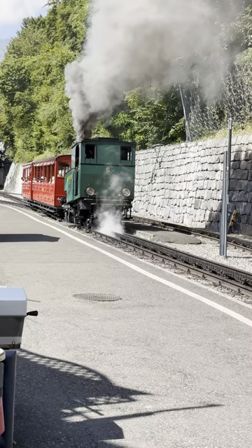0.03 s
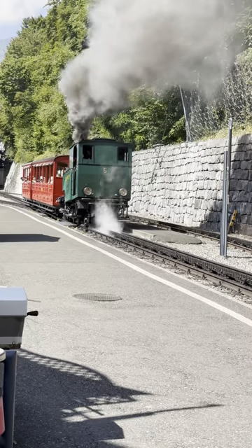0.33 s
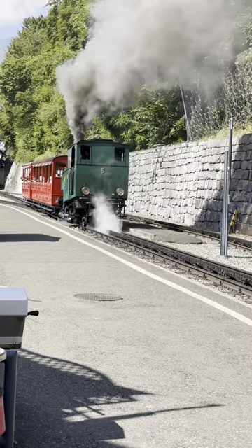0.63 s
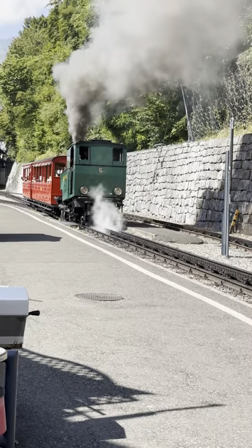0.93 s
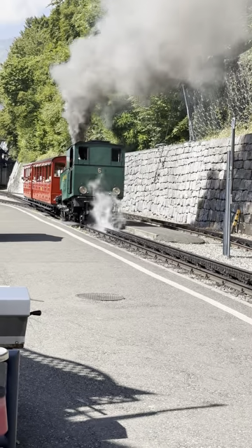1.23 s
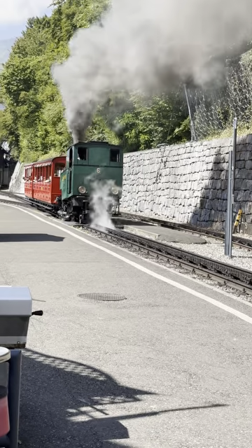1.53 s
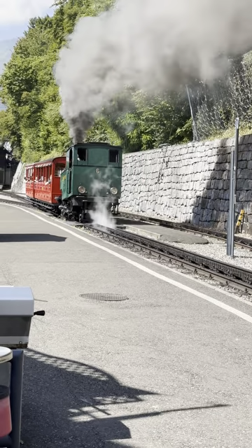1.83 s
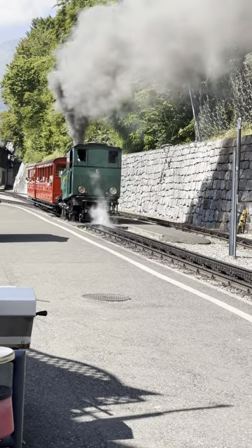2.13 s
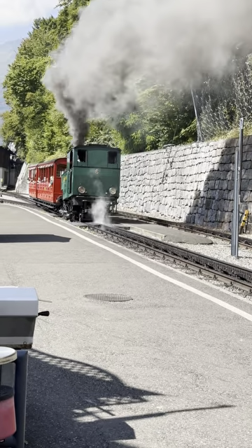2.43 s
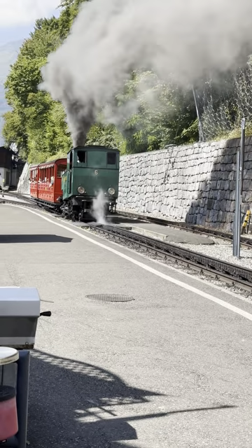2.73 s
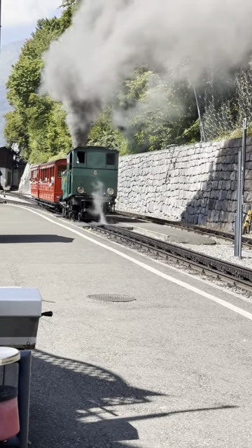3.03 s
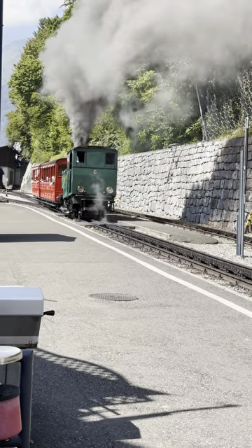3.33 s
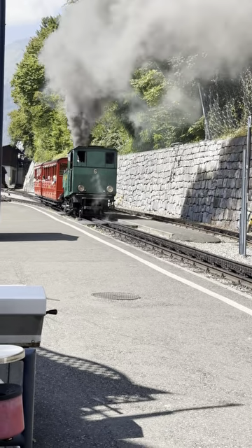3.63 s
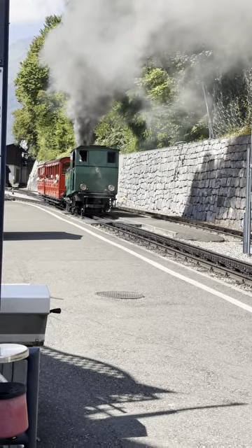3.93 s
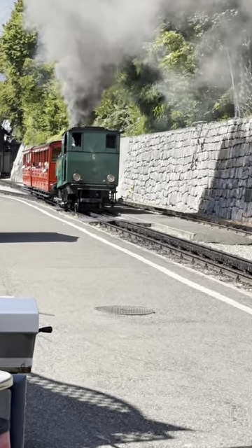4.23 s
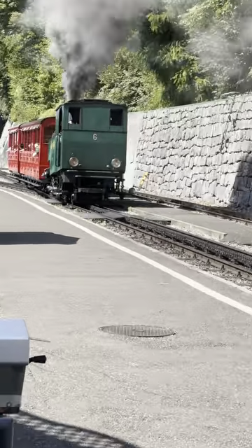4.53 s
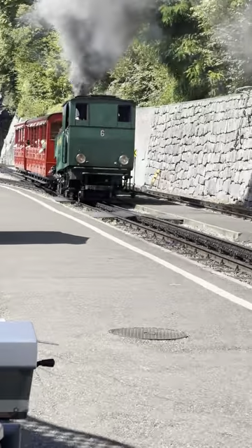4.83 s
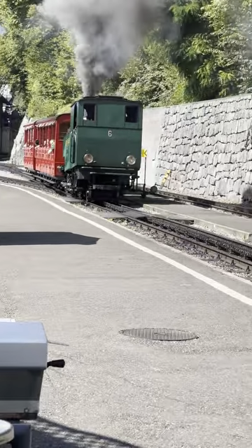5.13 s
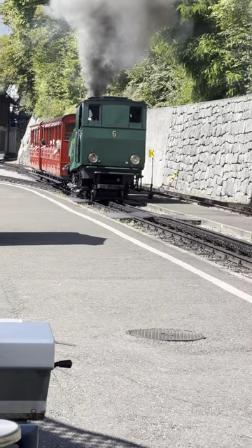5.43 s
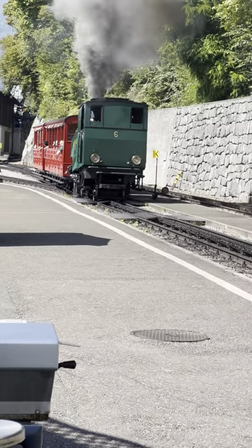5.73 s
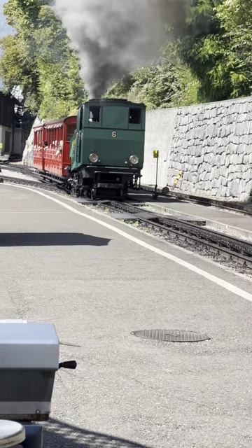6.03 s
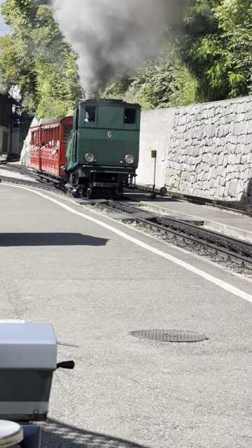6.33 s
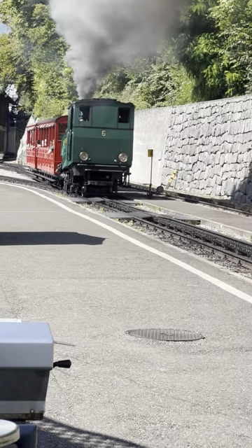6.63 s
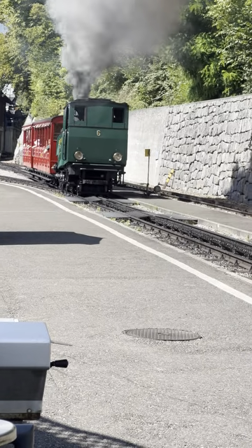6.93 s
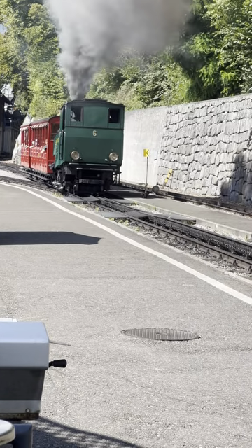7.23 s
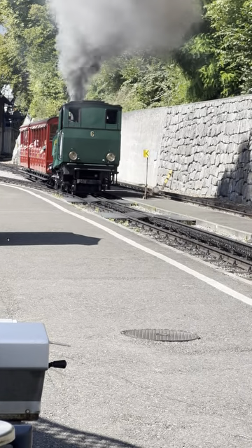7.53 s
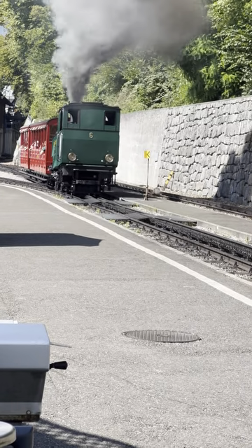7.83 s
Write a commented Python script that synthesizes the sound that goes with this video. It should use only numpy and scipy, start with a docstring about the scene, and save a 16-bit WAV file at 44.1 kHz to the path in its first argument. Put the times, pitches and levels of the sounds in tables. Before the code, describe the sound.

A short jet of steam shuts off, leaving a steam engine's rapid booming exhaust beats, deep rumble and a thin, fading leak.

```python
"""A jet of steam hisses from a small locomotive beside a platform, some way off in the open air.
The cock is shut after a second, leaving a thin, singing leak that fades. Throughout, the exhaust
beats about nine times a second, ringing the smokebox, chimney and blast pipe over the fire's rumble.
A loose part pings with the beats, the running gear clanks now and then, and a light breeze puffs."""
import sys
import numpy as np
from scipy.fft import rfft, irfft, next_fast_len
from scipy.io import wavfile
from scipy.ndimage import map_coordinates

SR = 44100
rng = np.random.default_rng(int(sys.argv[2]) if len(sys.argv) > 2 else 0)


def unload_audio(sound):
    """Save the sound as a 16-bit wav file, at the path given as the first command line argument."""
    columns = np.transpose(np.atleast_2d(sound))
    # keep every value between -1 and 1, then stretch to whole-number steps
    steps = np.round(np.clip(columns, -1, 1) * 32767)
    wavfile.write(sys.argv[1], SR, steps.astype(np.int16))


N = 347508
TIME = np.arange(N) / SR

# Slow trend of the smokebox boom. Each row: time in seconds, level in dB.
BOOM_TREND = [(0, -35.5), (.4, -28), (1.4, -30.5), (1.78, -39.5), (2.05, -29), (3.3, -32), (3.7, -39),
              (4.08, -26), (4.8, -35), (6.4, -37.5), (6.9, -31), (7.2, -40), (7.88, -32.5)]


def amp(db):
    """Decibels to gain."""
    return 10 ** (np.asarray(db) / 20)


def unit(x):
    """Scale to rms 1."""
    return x / np.sqrt(np.mean(x ** 2) + 1e-20)


def along(points, hz):
    """Interpolate (Hz, value) rows on a log frequency axis."""
    f, v = np.transpose(points)
    return np.interp(np.log(hz + 1), np.log(f + 1), v)


def curve(rows, times=TIME):
    """Interpolate (seconds, value) rows, by default at every sample."""
    return np.interp(times, *np.transpose(rows))


def fading(start_db, db_per_s, times=TIME):
    """A steadily falling level in dB."""
    return start_db - db_per_s * times


def wobble(rate_hz):
    """A smooth random curve with rate_hz knots a second."""
    knots = rng.standard_normal(int(N * rate_hz / SR) + 4)
    return map_coordinates(knots, [TIME * rate_hz], order=2)


def swell(t, rise_s, t60_s):
    """A soft rise to a crest at t = 0, then exponential decay."""
    return np.where(t < 0, np.exp(-(t / rise_s) ** 2), 1000 ** (-np.abs(t) / t60_s))


def filtered(x, response):
    """Apply a complex frequency response."""
    size = next_fast_len(N + SR // 4)
    return irfft(rfft(x, size) * response(np.fft.rfftfreq(size, 1 / SR)), size)[..., :N]


def colour(points):
    """Response of (Hz, dB) rows, falling away beyond both ends."""
    closed = [(points[0][0] / 2, -120), *points, (points[-1][0] * 2, -120)]
    return lambda f: amp(along(closed, f))


def resonances(modes):
    """Response of (Hz, width in Hz, dB) modes with steep skirts."""
    return lambda f: np.sqrt(sum(amp(db) ** 2 / (1 + ((f - hz) / width_hz) ** 2) ** 2
                                 for hz, width_hz, db in modes))


def rush(response):
    """Stereo turbulence of rms 1, nearly alike left and right."""
    # Stereo width. Each row: frequency in Hz, side against mid in dB.
    spread = [(40, -43.5), (70, -59.5), (150, -43), (300, -21.5), (640, -10), (1300, -8), (2500, -67.5),
              (5000, -52.5), (7000, -6.5), (10000, -7.5), (12000, -57), (15000, -1)]
    mid_side = lambda f: response(f) * np.array([np.ones_like(f), amp(along(spread, f))])
    mid, side = filtered(rng.standard_normal((2, N)), mid_side)
    return unit(np.array([mid + side, mid - side]))


def wall(x, echoes=8, echo_db=-20):
    """Weak early echoes off the stone wall and platform ripple the spectrum; output rms 1."""
    delays = (rng.uniform(.002, .03, echoes) * SR).astype(int)
    return unit(x + amp(echo_db) * sum(np.roll(x, delay, axis=-1) for delay in delays))


def jet(shut_s=1.12, closing_s=.14, sizzle_db_per_flow_db=2.4):
    """The open cock hisses, sizzles more as the flow rises, and spits twice before it is shut."""
    # Steam flow. Each row: time in seconds, relative level in dB.
    flow = [(0, -38.5), (.05, -40.5), (.16, -38.5), (.5, -42), (.68, -40), (.83, -41.5), (1.06, -52)]
    # Hiss and sizzle spectra. Each row: frequency in Hz, relative density in dB.
    hiss_colour = [(250, -25), (700, -4), (1100, -4.5), (2100, -1.5), (3300, 1.5), (4800, 0), (5900, 3),
                   (7300, 4.5), (9200, -0.5), (12000, -2), (15500, -13)]
    sizzle_colour = [(7500, -14.5), (10700, 4), (12500, 5), (15600, 3.5)]
    # Spurts of wet steam. Each row: crest in seconds, level in dB.
    spurts = [(.555, -40.5), (.93, -38)]
    flow_db = curve(flow)
    excess_db = flow_db - np.median([db for _, db in flow])
    opening = np.clip((shut_s - TIME) / closing_s, 0, 1)
    flutter = amp(0.6 * wobble(30.3))
    hiss = amp(flow_db + 2.5) * wall(rush(colour(hiss_colour)))
    sizzle = amp(-43 + sizzle_db_per_flow_db * excess_db) * wall(rush(colour(sizzle_colour)))
    spurting = sum(amp(db) * swell(TIME - s, rise_s=0.012, t60_s=0.39) for s, db in spurts)
    spit = rush(colour([(400, 6), (900, 2), (2000, -8), (3200, -1), (4500, -3), (7000, -11)]))
    return opening * flutter * (hiss + sizzle) + spurting * spit


def beat_times():
    """Times in seconds at which the crank passes an exhaust stroke, and that stroke's index."""
    # Crank speed. Each row: time in seconds, turns per second.
    speed = [(0, 2.26), (1.6, 2.305), (3.2, 2.416), (4.4, 2.433), (5.8, 2.298), (7.88, 2.297)]
    # Four slightly uneven strokes. Each entry: crank position in turns.
    stroke_turns = [.022, .266, .53, .791]
    turns = np.cumsum(curve(speed)) / SR
    marks = (np.arange(np.ceil(turns[-1]))[:, None] + stroke_turns).ravel()
    marks = marks[marks < turns[-1]]
    return np.interp(marks, turns, TIME), np.arange(len(marks)) % len(stroke_turns)


def beat_levels(times, stroke, scatter_db=1.78):
    """Boom, bark, rasp and ping dB of each beat: trend, stroke accent, chance and hard beats."""
    # The bark follows the engine's effort. Each row: time in seconds, level in dB.
    bark_trend = [(0, -45), (1.5, -43), (3.1, -41), (4.2, -41.5), (5.2, -41.5), (7.88, -44.5)]
    # Accents of the four strokes. Each row: extra boom, bark, rasp and ping in dB.
    accents = [(0, -1, 2, 2.5), (-0.5, -1.5, 1.5, -3), (0, 0, 1, 5), (0, 2, -0.5, 2)]
    # Beats that stand out. Each row: time in seconds, extra boom, bark and rasp in dB.
    hard_beats = [(.79, 2.5, -0.5, -2), (1.11, -3.5, 6.5, -2), (2.41, 3, -2.5, -2), (2.83, 4.5, -0.5, 2),
                  (2.94, 4, 1, 5.5), (3.03, -8, 4, 0.5), (3.13, 5, 4.5, 3), (3.35, 3.5, 0, 0),
                  (3.96, 5.5, 4, -5), (5.32, 1.5, 1.5, 3), (5.64, 8, -4, 0.5), (6.5, -1.5, 1.5, 3),
                  (6.61, 5, 3, 3)]
    rasp_db = fading(-50, db_per_s=0.6, times=times)
    ping_db = rasp_db - 3
    trend_db = np.transpose([curve(BOOM_TREND, times), curve(bark_trend, times), rasp_db, ping_db])
    levels_db = trend_db + np.array(accents)[stroke] + scatter_db * rng.standard_normal(trend_db.shape)
    for s, *extra_db in hard_beats:
        nearest = np.argmin(np.abs(times - s))
        levels_db[nearest, :3] += extra_db
    return levels_db.T


def puffs(sound, times, levels_db, rise_s, t60_s, lead_s=0):
    """One burst of sound(span, beat) per beat; levels_db sets its rms around the crest."""
    out = np.zeros((2, N))
    for beat, (s, db) in enumerate(zip(times, levels_db)):
        span = slice(max(0, int((s - .08) * SR)), int((s + .3) * SR))
        t = TIME[span] - s
        burst = sound(span, beat) * swell(t + lead_s, rise_s, t60_s)
        crest = (t > -.02) & (t < .03)
        out[:, span] += amp(db) * burst / np.sqrt(np.mean(burst[..., crest] ** 2))
    return out


def boom(times, levels_db, scatter_hz=4):
    """Each beat rings the smokebox's two low modes; turbulence shakes their strength and phase."""
    # Each row: mode in Hz, relative level in dB, share of the trend followed, growth in dB per second.
    smokebox_modes = [(210.9, -0.5, 0.87, 0), (254.7, -10, 0.13, 0.67)]
    trend_db = curve(BOOM_TREND, times)
    swing_db = trend_db - trend_db.mean()
    out = np.zeros((2, N))
    for hz, db, follows, db_per_s in smokebox_modes:
        beat_hz = hz + scatter_hz * rng.standard_normal(len(times))
        strength = amp(2.96 * wobble(90))
        drift_rad = 0.5 * wobble(45) + 0.2 * wobble(160) + 0.037 * np.array([wobble(53), wobble(80)])

        def mode(span, beat):
            return strength[span] * np.cos(2 * np.pi * beat_hz[beat] * TIME[span] + drift_rad[:, span])

        mode_db = levels_db + db + db_per_s * times - (1 - follows) * swing_db
        out += puffs(mode, times, mode_db, rise_s=.015, t60_s=.28)
    return out


def pings(times, levels_db, pitch_hz=1285, lead_s=0.0028):
    """A loose metal part rings briefly with each beat and sometimes knocks harder."""
    # Each row: time in seconds, level in dB.
    knocks = [(3.022, -38.5), (3.131, -48), (4.675, -48), (7.258, -47)]
    strikes = np.zeros(N)
    for s, db in [*zip(times - lead_s, levels_db), *knocks]:
        span = np.abs(TIME - s) < .2
        strikes[span] += amp(db) * swell(TIME[span] - s, rise_s=0.012, t60_s=0.11)
    rattle_rad = .7 * wobble(130) + .35 * wobble(500)
    return np.sqrt(2) * strikes * np.sin(2 * np.pi * pitch_hz * TIME + rattle_rad)


def exhaust():
    """Each beat booms, barks in the chimney, rasps at the blast pipe, hisses and shakes a loose part."""
    # Hollow pipe resonances. Each row: frequency in Hz, width in Hz, relative level in dB.
    chimney_modes = [(272, 31, -7.5), (340, 55, -1.5), (383.4, 33, 1.5), (476, 25, -3.5), (602, 87, -9)]
    blast_pipe_modes = [(750, 90, -7), (988, 140, 1), (1295, 98, 0.5), (1520, 600, -4), (2305, 110, -6),
                        (3100, 520, -12)]
    times, stroke = beat_times()
    boom_db, bark_db, rasp_db, ping_db = beat_levels(times, stroke)
    chimney = rush(resonances(chimney_modes))
    pipe = rush(resonances(blast_pipe_modes))
    steam = rush(colour([(2500, 1), (4000, -3.0), (7000, -5.5), (10000, -11)]))
    bark = puffs(lambda span, _: chimney[:, span], times, bark_db, rise_s=.016, t60_s=.33, lead_s=.0057)
    rasp = puffs(lambda span, _: pipe[:, span], times, rasp_db, rise_s=.018, t60_s=.3, lead_s=.002)
    wisp = puffs(lambda span, _: steam[:, span], times, rasp_db - 9, rise_s=.02, t60_s=.35)
    return boom(times, boom_db) + bark + rasp + wisp + pings(times, ping_db)


def fire():
    """The fire rumbles, drones in its box and sometimes thumps; the draught roars through it."""
    # Each row: time in seconds, level in dB.
    rumble_trend = [(0, -35), (1.1, -34.5), (2.4, -33.5), (4.4, -36), (6, -35), (7.88, -35.5)]
    # Spectra. Each row: frequency in Hz, relative density in dB.
    rumble_colour = [(20, -30.5), (30, -20.5), (42, 1), (60, -0.5), (85, -9), (120, -18.5)]
    drone_colour = [(65, -25), (88, -6.5), (110, 0), (140, -8.5), (175, -6.5), (230, -12), (400, -37)]
    draught_colour = [(120, -10), (220, -3), (400, 0), (550, -7.5), (780, -11), (1100, -12.5),
                      (1600, -16.5), (2500, -27.5), (5000, -40.5)]
    # Each row: crest in seconds, pitch in Hz, level in dB.
    dull_thumps = [(0.204, 68, -15.5), (.97, 70, -20.5), (1.44, 60, -20), (2.15, 57, -27),
                   (3.501, 49.6, -23), (6.082, 60, -24)]
    rumble = amp(curve(rumble_trend) + 0.35 * wobble(5.5)) * rush(colour(rumble_colour))
    drone = amp(fading(-32.5, db_per_s=0.38) + 1.2 * wobble(6)) * rush(colour(drone_colour))
    draught = amp(fading(-40, db_per_s=0.66) + 0.55 * wobble(7)) * rush(colour(draught_colour))
    thumps = np.zeros(N)
    for s, hz, db in dull_thumps:
        t = TIME - s
        thumps += amp(db) * swell(t, rise_s=0.014, t60_s=0.091) * np.cos(2 * np.pi * hz * t)
    return rumble + drone + draught + thumps


def breeze():
    """Light puffs of wind buffet left and right, each side with its own low noise."""
    # Each row: crest in seconds, half-width in seconds, level in dB.
    gusts = [(.35, 0.29, -42), (.98, 0.035, -34), (1.41, 0.17, -40), (7.15, 0.27, -55)]
    # Each row: frequency in Hz, relative density in dB.
    wind_colour = [(35, -14), (55, 4), (100, -1), (160, -12), (240, -23)]
    strength = sum(amp(db) * np.exp(-((TIME - s) / width_s) ** 2) for s, width_s, db in gusts)
    return strength * unit(filtered(rng.standard_normal((2, N)), colour(wind_colour)))


def leak(low_hz=1027, high_hz=14400, swell_s=0.39):
    """Steam seeps through a valve: thin hiss, wavering singing bands and two faint whistles."""
    # Flow as the pressure drops. Each row: time in seconds, relative level in dB.
    flow_trend = [(1.15, -50.5), (1.4, -53.5), (3.4, -55), (7.88, -58)]
    # Each row: frequency in Hz, relative density in dB.
    hiss_colour = [(600, -8), (1800, 4), (3100, 2.5), (5200, 0), (7000, -4.5), (9000, -7), (11000, -11),
                   (12500, -12), (14000, -16.5), (15500, -19.5)]
    # Each row: frequency in Hz, width in Hz, relative level in dB.
    valve_modes = [(2330, 60, -1), (3430, 65, 0), (3950, 50, -3.5), (4180, 65, 0), (5090, 90, -1.5),
                   (5700, 130, -6), (6700, 100, -6.5), (7620, 110, -6.5), (10250, 130, -13),
                   (11100, 170, -13.5)]
    # Swells of the low whistle. Each row: crest in seconds, level in dB.
    swells = [(2.2, -64), (4.2, -62), (5.13, -58)]
    flow = amp(curve(flow_trend) + 0.48 * wobble(15))
    hiss = amp(2.0) * wall(rush(colour(hiss_colour)))
    singing = amp(-4.5 + 1.3 * wobble(7)) * rush(resonances(valve_modes))
    swelling = sum(amp(db) * np.exp(-((TIME - s) / swell_s) ** 2) for s, db in swells)
    low_whistle = (amp(-68) + swelling) * rush(resonances([(low_hz, 9.9, 0)]))
    high_whistle = amp(fading(-57, db_per_s=4)) * rush(resonances([(high_hz, 230, 0)]))
    return flow * (hiss + singing) + low_whistle + high_whistle


def clanks(width_hz=80):
    """The running gear scrapes, clicks and rings now and then, each part at its own pitch."""
    # Each row: time in seconds, scrape, click and ring levels in dB, ring pitch in Hz.
    hits = [(3.709, -53, -35.5, -60, 7300), (3.905, -47, -41, -60, 2380), (4.703, -47.5, -46, -51, 3090),
            (5.29, -51.5, -49, -53, 5000), (7.698, -56, -62, -55, 2290)]
    # Each row: multiple of the ring pitch, relative level in dB.
    gear_modes = [(.66, -16), (.87, -2), (1, 5), (1.24, -14), (1.9, -9)]
    scrape, click, ring = np.zeros(N), np.zeros(N), np.zeros((2, N))
    for s, scrape_db, click_db, ring_db, hz in hits:
        t = TIME - s
        steel = rush(resonances([(hz * multiple, width_hz, db) for multiple, db in gear_modes]))
        scrape += amp(scrape_db) * swell(t, rise_s=0.023, t60_s=0.45)
        click += amp(click_db) * swell(t, rise_s=.001, t60_s=0.012)
        ring += amp(ring_db) * swell(t, rise_s=0.0044, t60_s=0.19) * steel
    grit = rush(colour([(900, -1), (2200, 5.0), (4000, 1), (8000, -8.5), (11000, -22)]))
    snap = rush(colour([(1200, 17), (3000, -4), (8000, -2), (11000, -19)]))
    roughness = amp(1.8 * wobble(400))
    return scrape * roughness * grit + click * snap + ring


def scene():
    """The locomotive stands ahead, its treble reaching one side slightly early; the breeze is close."""
    # Each row: frequency in Hz, phase of left against right in radians.
    phase_rad = [(5200, 0), (6200, -.7), (7500, -1.5), (9200, -2.1), (10400, -2.6), (11200, -3.14),
                 (13500, -3.14), (14600, -4.1)]
    sides = np.array([[1], [-1]])
    locomotive = exhaust() + fire() + jet() + leak() + clanks()
    return filtered(locomotive, lambda f: np.exp(.5j * along(phase_rad, f) * sides)) + breeze()


def record(dry, top_hz=15750):
    """Brick-wall low-pass at top_hz."""
    return filtered(dry, lambda f: f < top_hz)


dry = scene()
out = record(dry)
unload_audio(out)
```